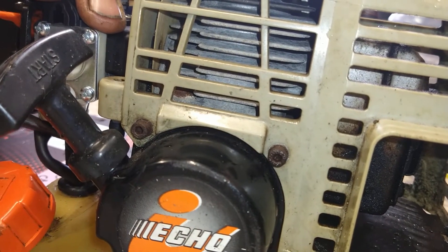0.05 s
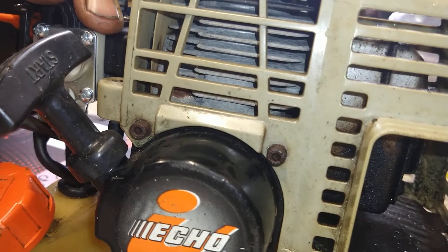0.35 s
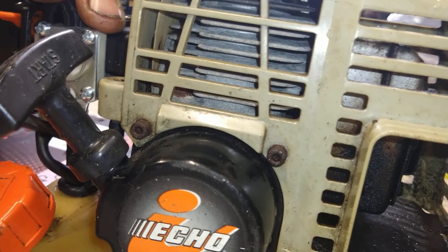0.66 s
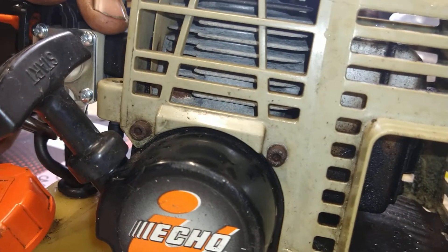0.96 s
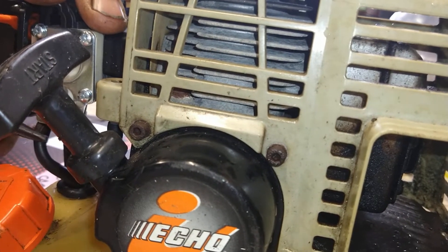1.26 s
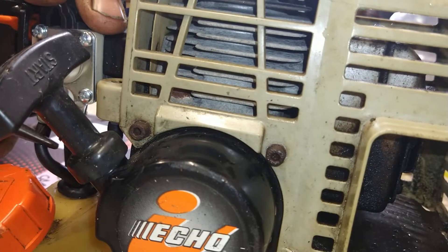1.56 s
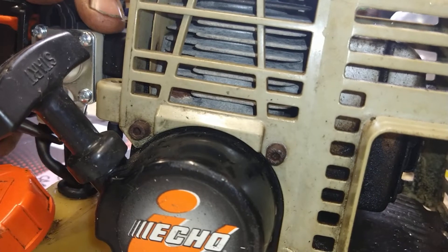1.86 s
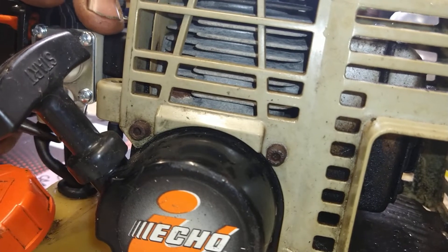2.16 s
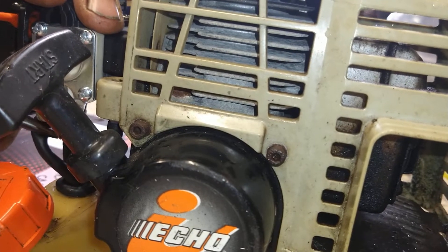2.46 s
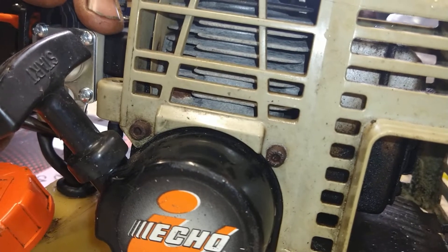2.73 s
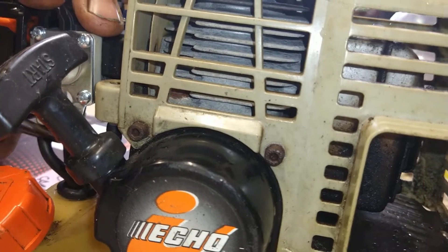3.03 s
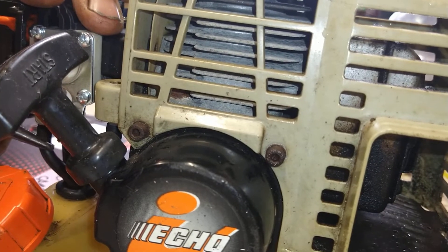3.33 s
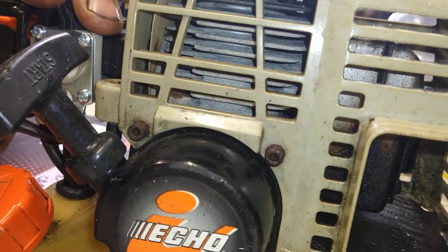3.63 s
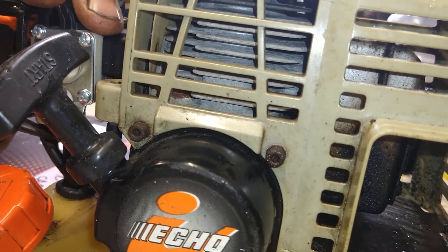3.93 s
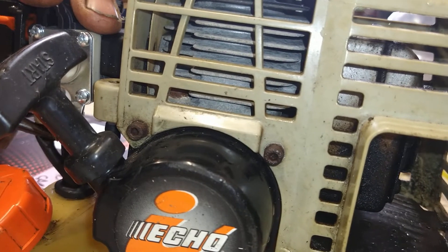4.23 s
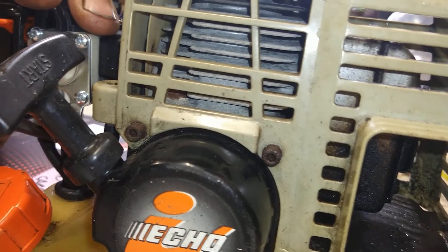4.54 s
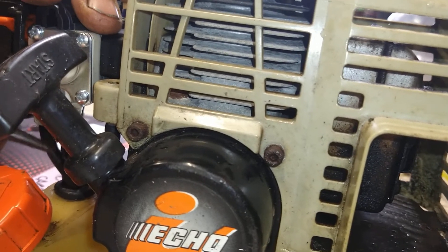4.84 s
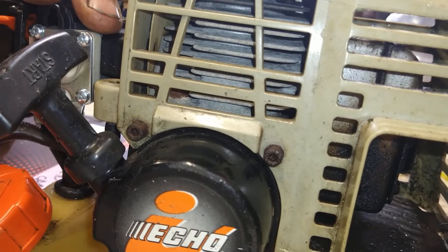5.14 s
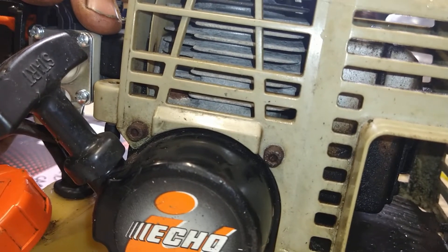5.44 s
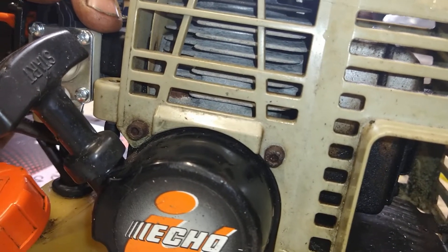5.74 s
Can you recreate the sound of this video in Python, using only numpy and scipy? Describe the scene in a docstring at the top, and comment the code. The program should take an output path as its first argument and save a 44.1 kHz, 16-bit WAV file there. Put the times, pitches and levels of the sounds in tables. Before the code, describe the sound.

A steady low drone of fans and electrical hum, with a few faint knocks and rubs from a hand on a switched-off machine.

```python
"""Quiet workshop, close to a bench, in stereo.
Two fan motors at slightly different speeds beat against each other and against a mains hum,
over the low roar and rush of the air they move. Another small motor whines faintly.
A hand steadying a switched-off machine makes faint bumps, ticks and rubs on its plastic housing."""
import sys
import numpy as np
from scipy import signal
from scipy.fft import rfft, irfft
from scipy.io import wavfile

SR = 44100
rng = np.random.default_rng(int(sys.argv[2]) if len(sys.argv) > 2 else 0)


def transcribe(u):
    """Save the signal u as a 16-bit wav file named by the first command-line argument.

    u: samples, shape (n,) or (channels, n), limited to [-1, 1]; the rate is SR.
    q: integer samples, one column per channel.
    """
    v = np.clip(np.atleast_2d(u).T, -1, 1)
    q = np.round(v * 32767).astype(np.int16)
    wavfile.write(sys.argv[1], SR, q)


N = 255339
T = np.arange(N) / SR
HZ = np.fft.rfftfreq(N, 1 / SR)
MOTOR_WANDER = 0.001  # rms share of speed


def fans():
    """Two shafts turning at close speeds; their partials beat."""
    # first fan: shaft multiple, level/dB
    fan_a = [(1, -53), (2, -51.5), (3, -44), (4, -45.5), (5, -53), (6, -59.5), (17, -65.5)]
    # second fan: shaft multiple, level/dB
    fan_b = [(1, -62.5), (3, -45.5), (4, -50.6), (6, -55.5)]
    first = hum(fan_a, base_hz=50.56, waver=0.1, wander=MOTOR_WANDER)
    second = hum(fan_b, base_hz=48.21, waver=0.15, wander=MOTOR_WANDER)
    return first + second


def hum(partials, base_hz, waver, wander=0):
    """Partials locked to one shaft or the mains; waver (strength) and wander (speed) are rms shares."""
    speed_hz = base_hz * (1 + wander * drift(rate_hz=0.63))
    turns = np.cumsum(speed_hz) / SR
    stereo = np.zeros((2, N))
    for multiple, db in partials:
        tone = np.exp(2j * np.pi * (multiple * turns + rng.random()))
        tone *= 1 + waver * drift(rate_hz=5)
        stereo += np.sqrt(2) * gain_of(db) * (ports(multiple * base_hz)[:, None] * tone).real
    return stereo


def roar():
    """Low fan turbulence, throbbing unevenly and swelling slowly."""
    # spectrum before treble loss: f/Hz, density/(dB per Hz)
    spectrum = [(20, -100), (38, -94), (50, -85), (64, -70.5), (100, -66), (175, -63), (225, -65),
                (360, -66.5), (440, -65), (520, -70), (630, -71.5), (760, -78.5), (1200, -120)]
    # slow swell: t/s, gain/dB
    swell = [(0, 0), (1.2, 0.5), (2.3, 0), (3.3, 1), (4, -0.3), (4.8, 0.5), (5.4, 0), (5.79, 1.3)]
    treble_loss_db = 40 * np.log10(1 + (HZ / 3000) ** 2)
    turbulence = room_noise(at_hz(spectrum, HZ) - treble_loss_db)
    throb_db = 0.35 * drift(rate_hz=27)
    return turbulence * gain_of(over_time(swell) + throb_db)


def rush():
    """Air through blades and grilles, lifted at duct resonances; slightly brighter at both ends."""
    # spectrum before duct lift: f/Hz, density/(dB per Hz)
    spectrum = [(400, -100), (790, -75.5), (1000, -76), (1240, -76), (1420, -75), (1700, -79), (2050, -82),
                (2250, -86), (2580, -83.5), (2790, -79.5), (3200, -90), (3450, -92), (4300, -94),
                (6500, -96.5), (9800, -105.2), (11200, -110.2), (15500, -114.9)]
    # duct resonances: f/Hz, width/Hz, lift/dB
    duct = [(984, 49, 3.5), (1868, 81, 4.5), (2217, 118, 6.5), (2387, 77, 6), (6240, 350, 1)]
    # treble trim: t/s, gain/dB
    treble_trim = [(0, 1), (.5, 0.14), (4.6, 0), (5.79, 1)]
    crossover_hz = 3000
    lift_db = sum(resonance(HZ, f, width, db) for f, width, db in duct)
    air = room_noise(at_hz(spectrum, HZ) + lift_db)
    treble = irfft(rfft(air) * HZ ** 4 / (HZ ** 4 + crossover_hz ** 4), N)
    return air - treble + treble * gain_of(over_time(treble_trim))


def mains_hum():
    """Even harmonics of a supply steady in frequency."""
    # partials: mains multiple, level/dB
    partials = [(2, -47), (4, -50), (6, -63.5)]
    return hum(partials, base_hz=59.985, waver=0.15)


def motor_whine():
    """Thin, wavering tone of a small motor."""
    # partial: pitch multiple, level/dB
    partials = [(1, -56.5)]
    return hum(partials, base_hz=409.85, waver=0.5, wander=MOTOR_WANDER)


def bumps():
    """The hand knocks the housing; a softer bump both starts and dies more slowly."""
    # hollow plastic housing: f/Hz, width/Hz, level/dB
    housing = [(785, 340, 3), (1175, 420, -6), (1850, 800, -12.5)]
    # knocks: t/s, level/dB, T60/s, hardness/dB, ringing share of energy
    knocks = [(.011, -41, 0.055, -8, 0.1), (.1, -43.5, 0.29, -1, 0.05), (.124, -42, 0.13, -3, 0),
              (1.109, -39.5, 0.038, 4, 0.3), (1.6235, -34.8, 0.039, 2, 0.2), (3.666, -42, 0.15, -6, 0),
              (3.778, -41, .09, -8, 0.1), (3.802, -36.3, 0.049, -7, .6), (4.149, -39, 0.04, 7, .2)]
    return sum(contact(struck(housing, hardness_db), start_s, db, t60_s, rise_s=0.053 * t60_s, ring=ring)
               for start_s, db, t60_s, hardness_db, ring in knocks)


def ticks():
    """A loose part ticks dryly."""
    # modes of the part: f/Hz, width/Hz, level/dB
    loose_part = [(3660, 510, -1.5), (7070, 880, -10.5), (14500, 5000, -36)]
    # impacts: t/s, level/dB, T60/s, hardness/dB
    impacts = [(.06, -48, .017, 0), (.116, -51, 0.013, -8), (.151, -52, .018, 1), (.2345, -43, .016, -6),
               (.281, -54, 0.018, -5), (2.218, -54, .02, -3), (2.844, -55, .023, 0), (3.794, -51, 0.026, 8)]
    return sum(contact(struck(loose_part, hardness_db), start_s, db, t60_s, rise_s=0.0007, ring=0.3)
               for start_s, db, t60_s, hardness_db in impacts)


def rubs():
    """A fingertip slides briefly: friction only."""
    # friction bands: f/Hz, width/Hz, level/dB
    bands = [(2300, 1200, 7), (3750, 900, -11), (7800, 4500, -17)]
    # strokes: t/s, level/dB, T60/s
    strokes = [(.117, -46, .062), (3.783, -44.5, 0.08)]
    return sum(contact(bands, start_s, db, t60_s, rise_s=0.016) for start_s, db, t60_s in strokes)


def struck(modes, hardness_db):
    """A harder contact lifts the upper modes against the lowest."""
    return [modes[0]] + [(f, width, db + hardness_db) for f, width, db in modes[1:]]


def contact(modes, start_s, level_db, t60_s, rise_s, ring=0):
    """A touch excites modes: the energy share `ring` as clean tones, the rest as gritty friction."""
    t = np.arange(SR // 4) / SR
    hz = np.fft.rfftfreq(len(t), 1 / SR)
    colour = sum(resonance(hz, f, width, gain_of(db)) for f, width, db in modes)
    # close by, so much alike at both ports
    friction = rng.standard_normal(len(t)) + 0.5 * rng.standard_normal((2, len(t)))
    grit = unit_rms(irfft(rfft(friction) * colour, len(t)))
    tone = np.zeros(len(t))
    for f, _, db in modes:
        mode_hz = f * rng.normal(1, 0.015)  # the grip shifts each mode
        tone += gain_of(db) * np.sin(2 * np.pi * (mode_hz * t + rng.random()))
    body = np.sqrt(ring) * unit_rms(tone) + np.sqrt(1 - ring) * grit
    attack = np.minimum(t / rise_s, 1)
    decay = np.exp(-np.log(1000) * np.maximum(t - rise_s, 0) / t60_s)
    sound = gain_of(level_db) * body * attack * decay
    return np.pad(sound, ((0, 0), (round(start_s * SR), N)))[:, :N]


def room_noise(density_db):
    """Stereo noise: one part common to both ports, the rest from all round the room."""
    # likeness of the ports: f/Hz, correlation
    likeness = [(60, 0.91), (190, 0.96), (280, 0.51), (460, 0.71), (600, 0.38), (800, 0.57), (960, 0.4),
                (1070, 0.035), (1280, 0.55), (1430, 0.38), (1650, 0.67), (2150, 0.69), (2650, 0.072),
                (6200, 0.2), (12000, 0.083)]
    common = at_hz(likeness, HZ)
    left = white_spectrum()
    right = common * left + np.sqrt(1 - common ** 2) * white_spectrum()
    return irfft(np.array([left, right]) * ports(HZ) * gain_of(density_db), N)


def ports(hz):
    """Complex gains of the two microphone ports; the fans stand to the right, so the left is delayed."""
    # port balance: f/Hz, left minus right/dB
    balance = [(100, 0), (200, -1.5), (300, 1), (410, -4.5), (620, 4.5), (850, 0), (1050, -4), (1250, -1),
               (1500, -7), (1900, -2.5), (2280, 1), (2850, -4), (4000, -3), (6500, -6), (10500, -6),
               (15000, -4)]
    # bending round bench and machine: f/Hz, added left phase lead/rad
    bend = [(50, -0.65), (200, 1.02), (390, 0.5), (490, 1.26), (700, -0.87), (860, 1), (960, 4),
            (1280, -0.33), (1620, 1), (2400, 1), (4500, 1), (7000, 0.15)]
    delay_s = 21.5 / SR
    ratio = gain_of(at_hz(balance, hz))
    lead_rad = at_hz(bend, hz) - 2 * np.pi * hz * delay_s
    left = ratio * np.exp(1j * lead_rad)
    return np.array([left, np.ones_like(ratio)]) * np.sqrt(2 / (1 + ratio ** 2))


def white_spectrum():
    """White noise bins, unit power per Hz."""
    real, imag = rng.standard_normal((2, len(HZ)))
    return (real + 1j * imag) * np.sqrt(N * SR) / 2


def drift(rate_hz):
    """Slow random motion, unit rms."""
    return unit_rms(irfft(white_spectrum() * np.exp(-(HZ / rate_hz) ** 2) * (HZ > 0), N))


def resonance(hz, centre_hz, width_hz, height):
    """Lorentzian peak; width at half height."""
    return height / (1 + (2 * (hz - centre_hz) / width_hz) ** 2)


def at_hz(table, hz):
    """Interpolates on a log-frequency axis."""
    f, value = np.transpose(table)
    return np.interp(np.log(hz + 1), np.log(f + 1), value)


def over_time(table):
    """Interpolates at every sample."""
    return np.interp(T, *np.transpose(table))


def gain_of(db):
    """Decibels to amplitude."""
    return 10 ** (np.asarray(db) / 20)


def unit_rms(x):
    """Scales to rms 1."""
    return x / np.sqrt(np.mean(x ** 2) + 1e-20)


def scene():
    """Hums, moving air and the hand."""
    hums = fans() + mains_hum() + motor_whine()
    air = roar() + rush()
    hand = bumps() + ticks() + rubs()
    return hums + air + hand


def record(dry):
    """Soft ends, then a steep low-pass."""
    fade_s, cutoff_hz = 0.004, 15730
    from_end_s = np.minimum(T, T[::-1])
    fade = np.sin(np.pi / 2 * np.minimum(from_end_s / fade_s, 1)) ** 2
    taps = signal.firwin(1023, cutoff_hz, window=("kaiser", 9), fs=SR)
    return signal.oaconvolve(dry * fade, taps[None], "same")


dry = scene()
out = record(dry)
transcribe(out)
```